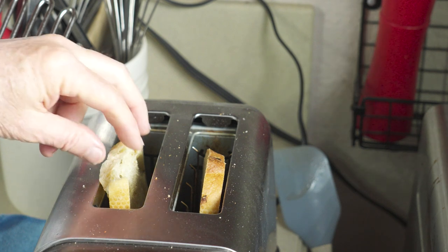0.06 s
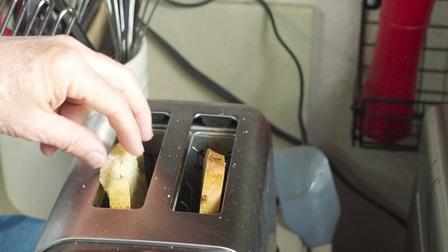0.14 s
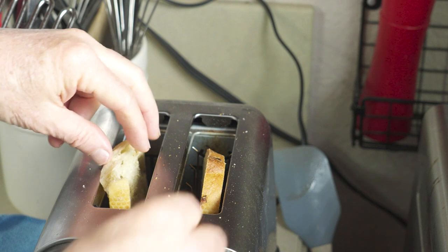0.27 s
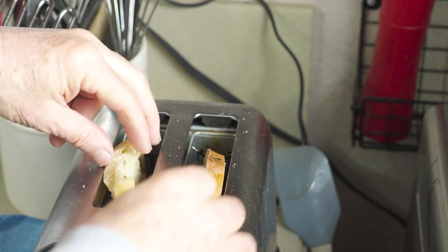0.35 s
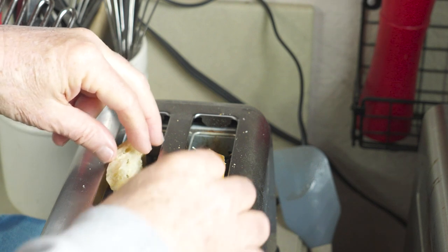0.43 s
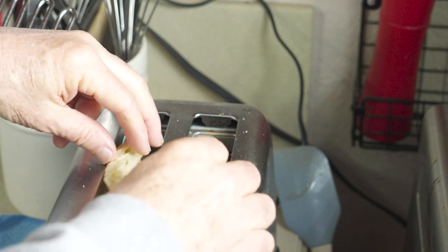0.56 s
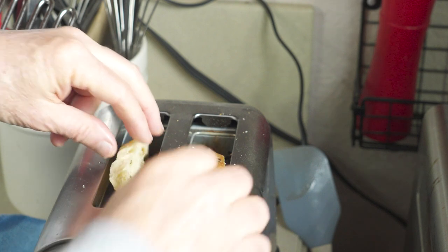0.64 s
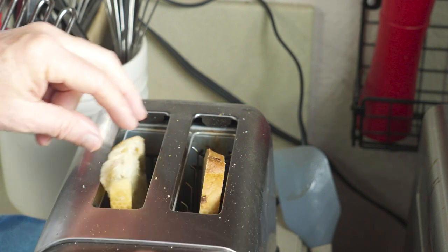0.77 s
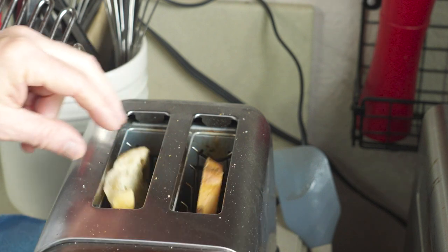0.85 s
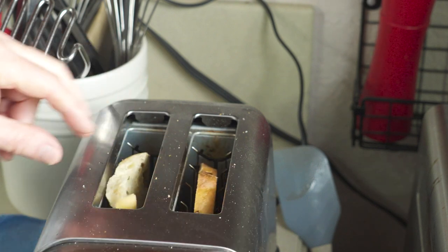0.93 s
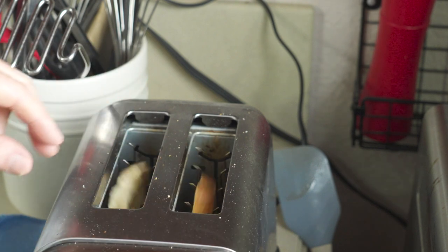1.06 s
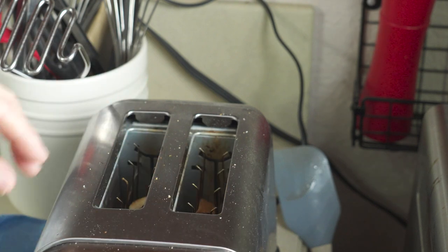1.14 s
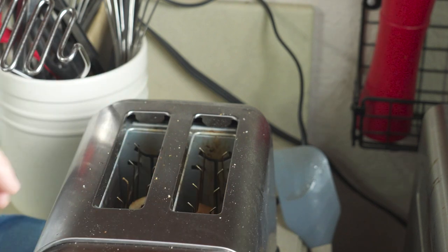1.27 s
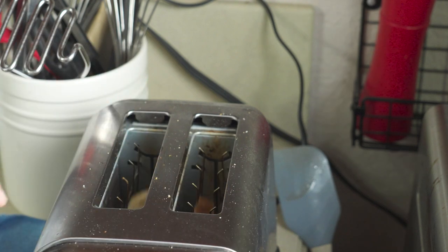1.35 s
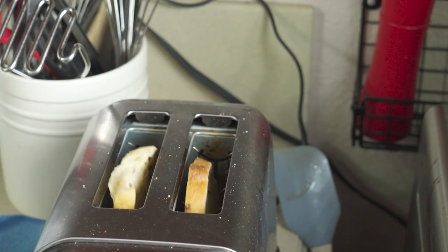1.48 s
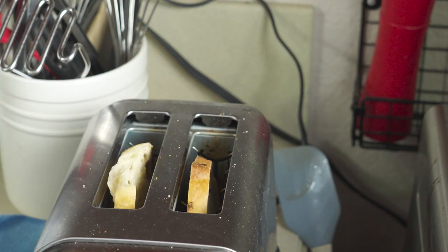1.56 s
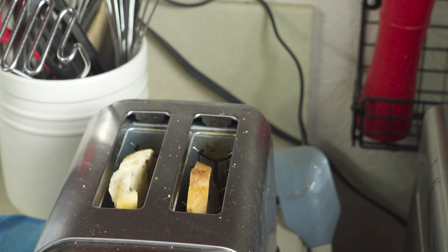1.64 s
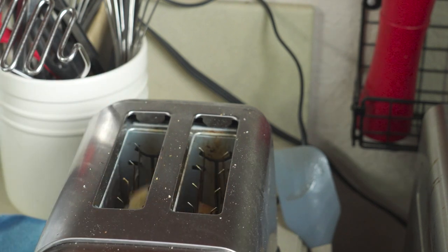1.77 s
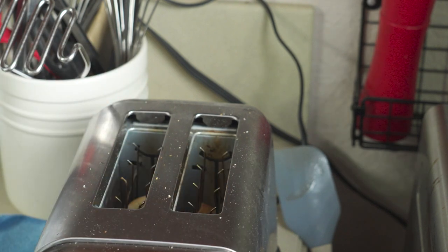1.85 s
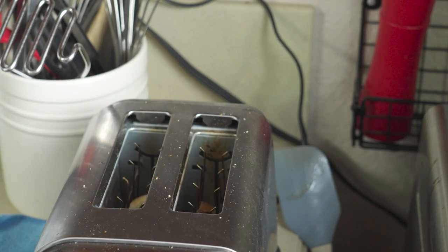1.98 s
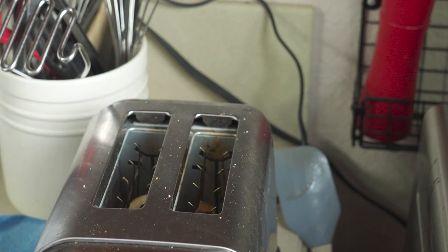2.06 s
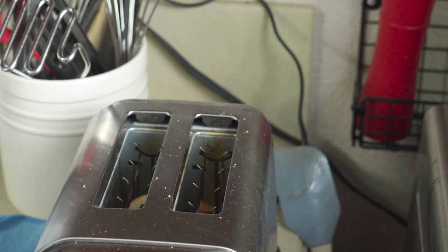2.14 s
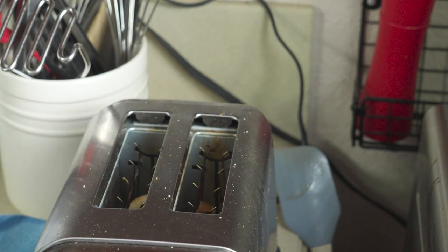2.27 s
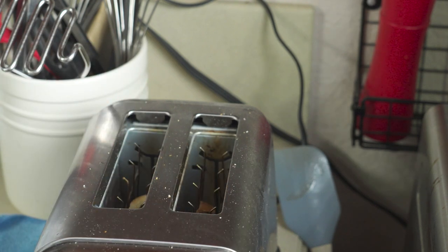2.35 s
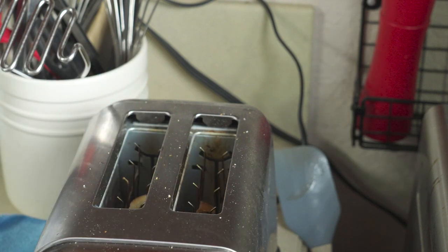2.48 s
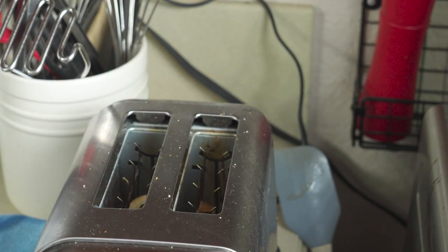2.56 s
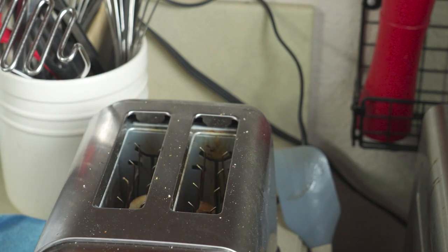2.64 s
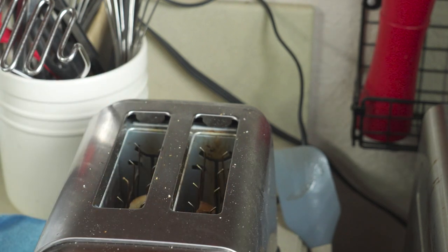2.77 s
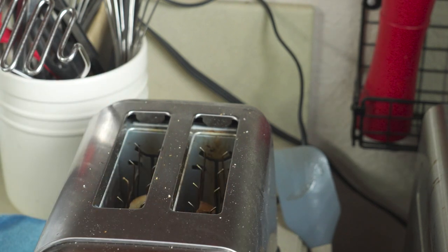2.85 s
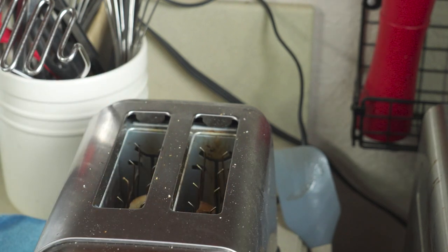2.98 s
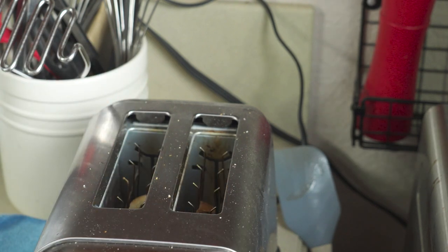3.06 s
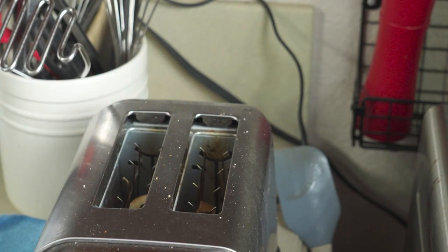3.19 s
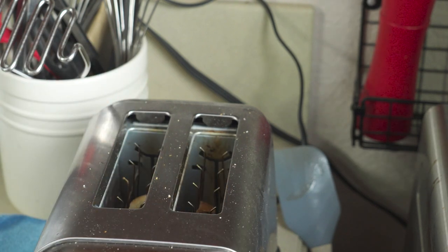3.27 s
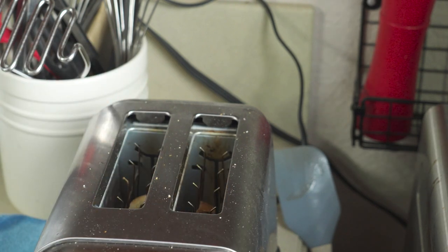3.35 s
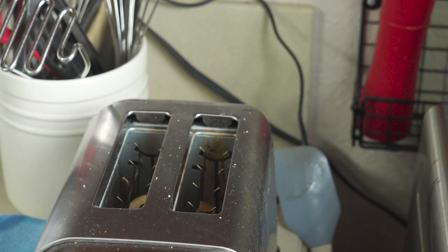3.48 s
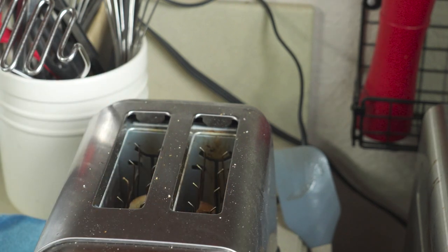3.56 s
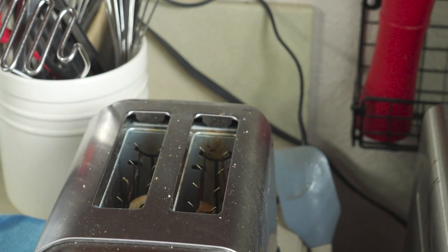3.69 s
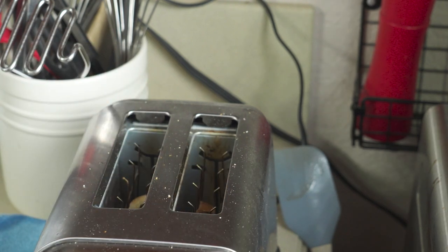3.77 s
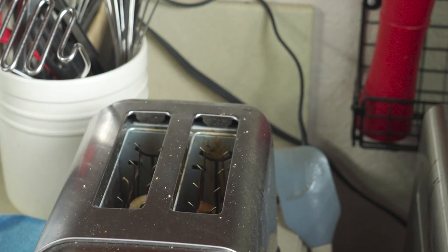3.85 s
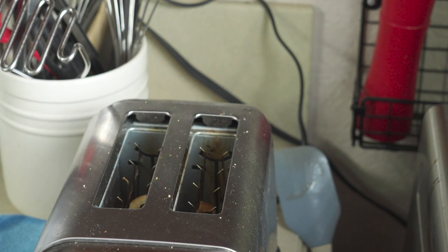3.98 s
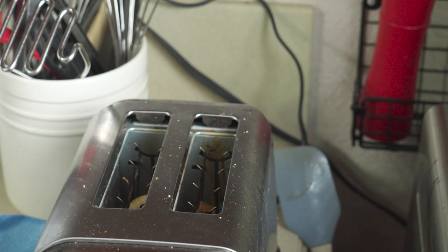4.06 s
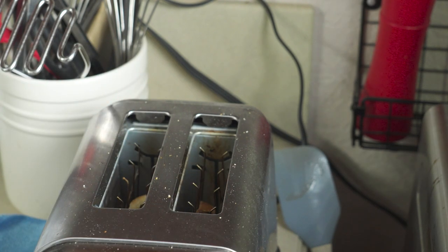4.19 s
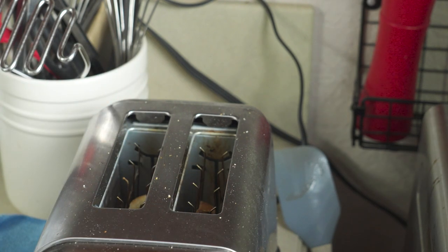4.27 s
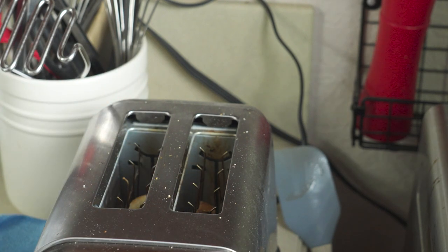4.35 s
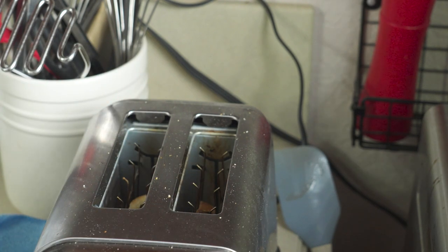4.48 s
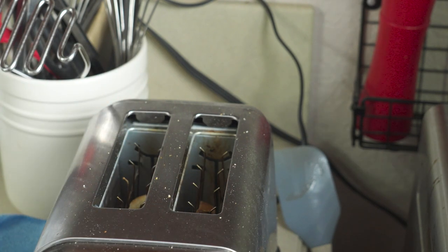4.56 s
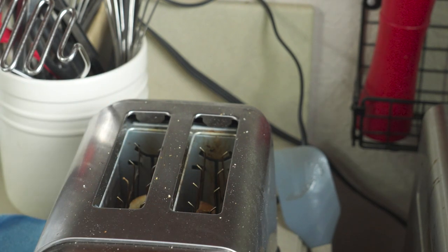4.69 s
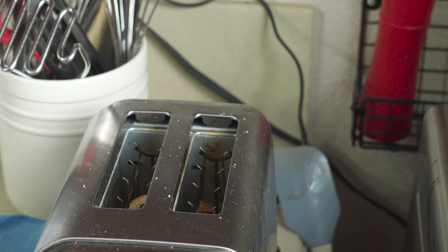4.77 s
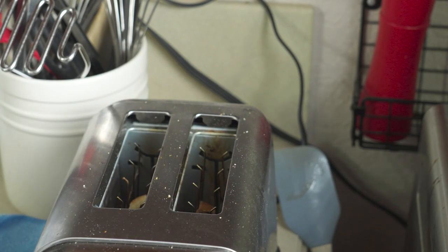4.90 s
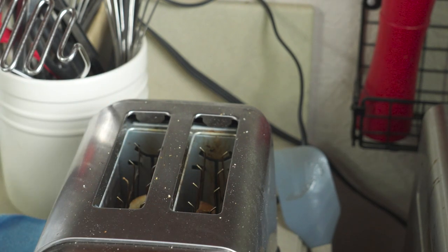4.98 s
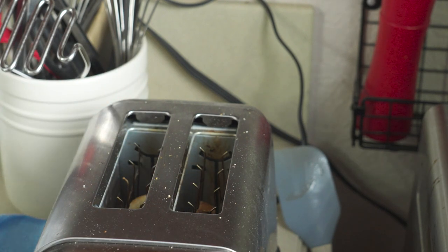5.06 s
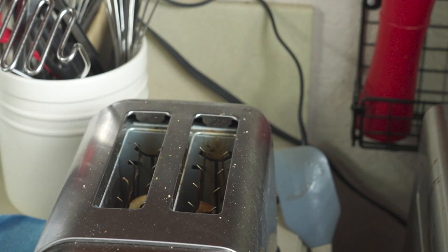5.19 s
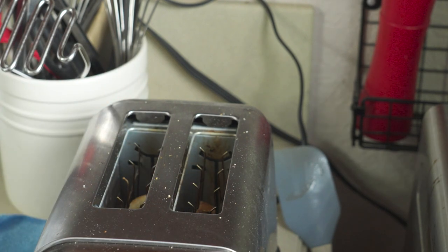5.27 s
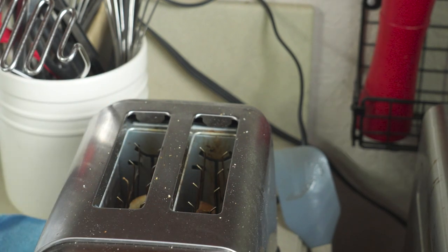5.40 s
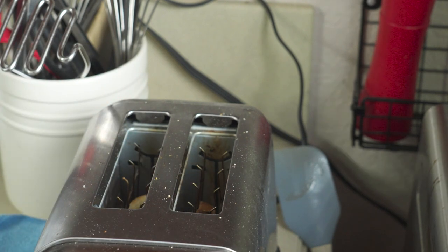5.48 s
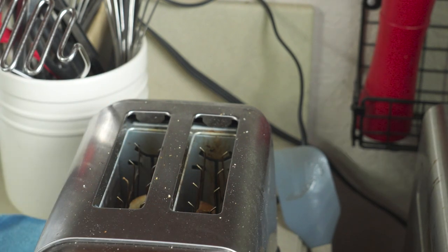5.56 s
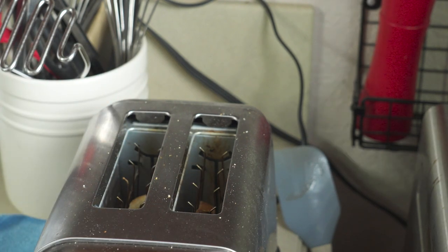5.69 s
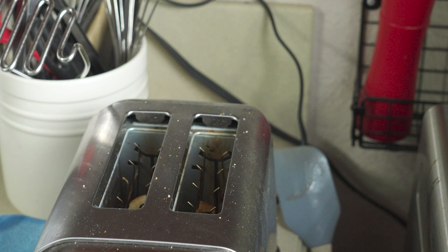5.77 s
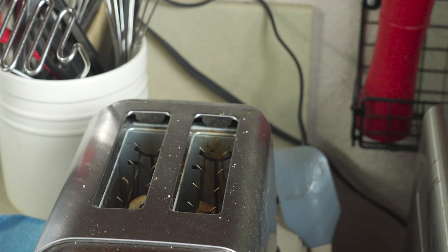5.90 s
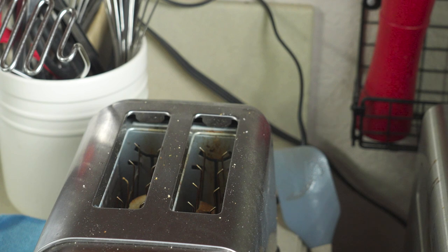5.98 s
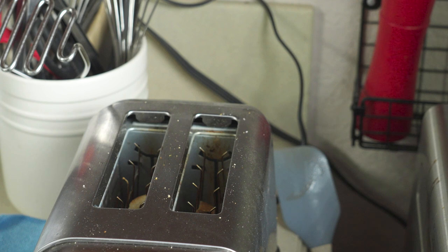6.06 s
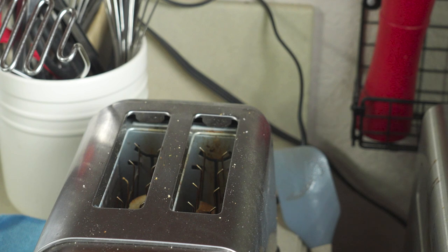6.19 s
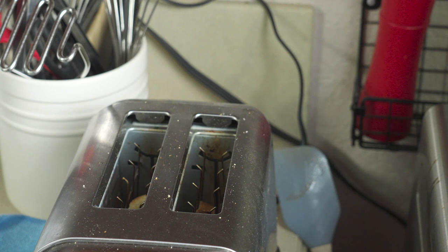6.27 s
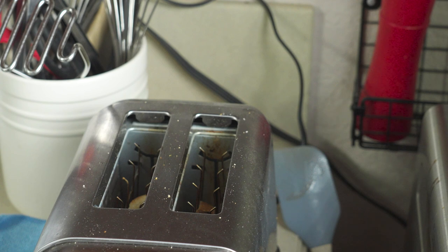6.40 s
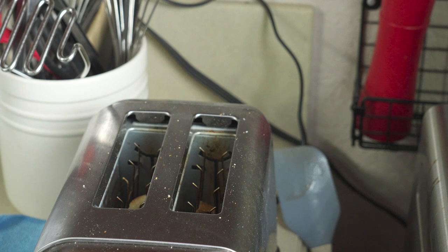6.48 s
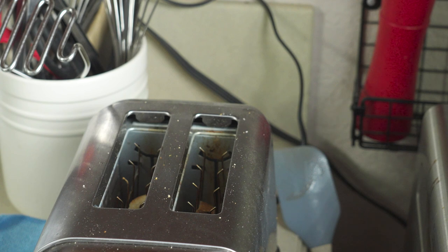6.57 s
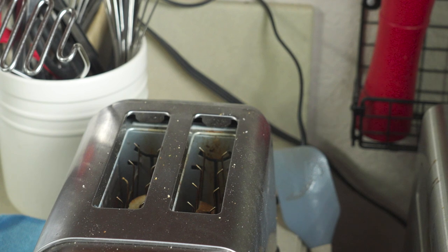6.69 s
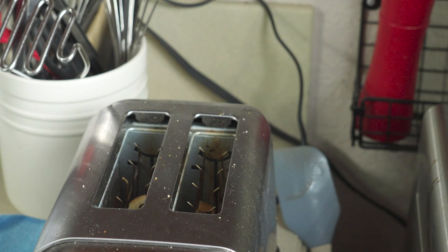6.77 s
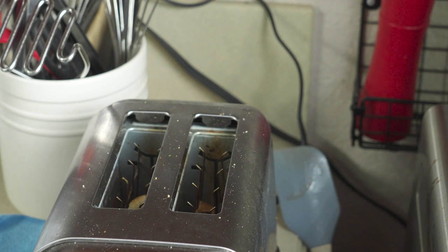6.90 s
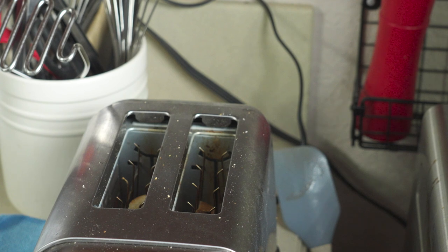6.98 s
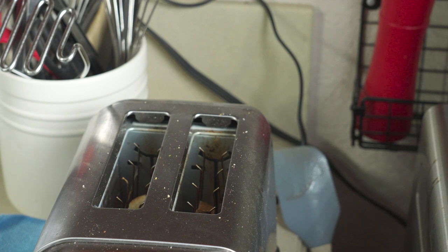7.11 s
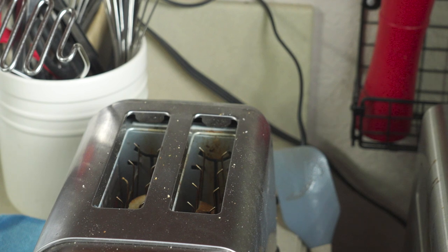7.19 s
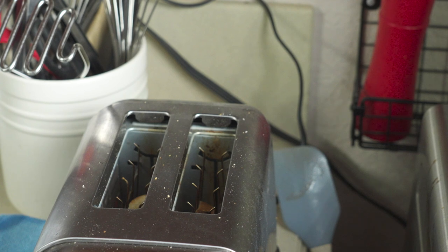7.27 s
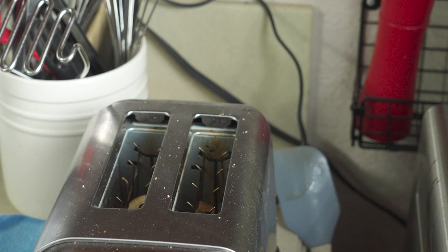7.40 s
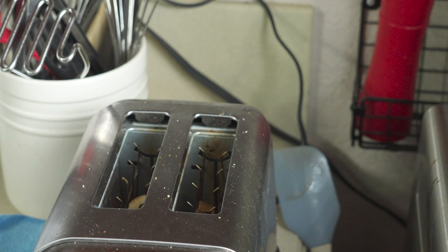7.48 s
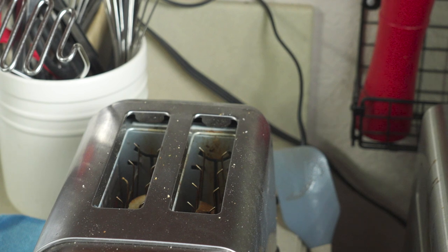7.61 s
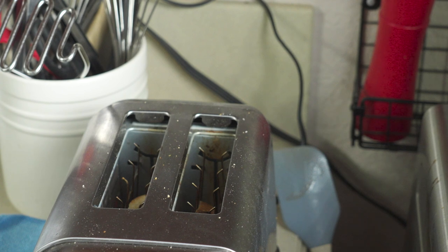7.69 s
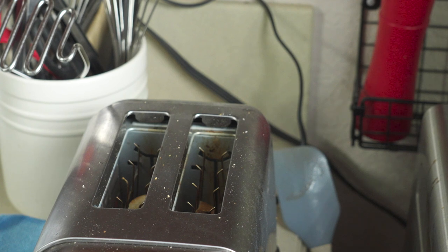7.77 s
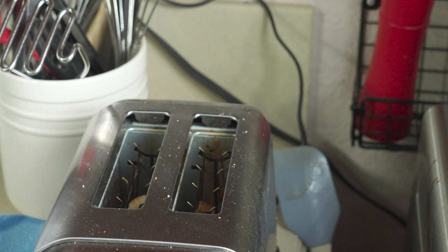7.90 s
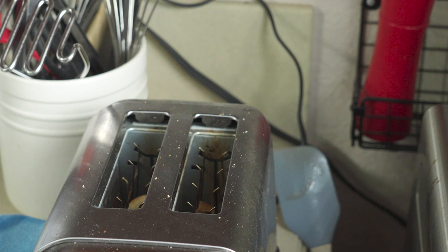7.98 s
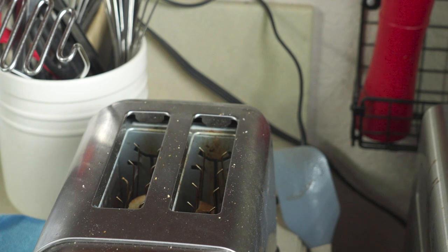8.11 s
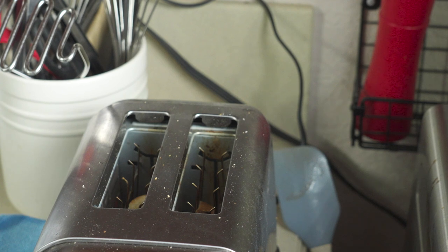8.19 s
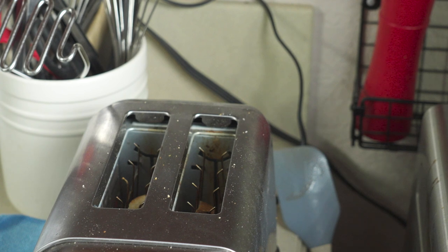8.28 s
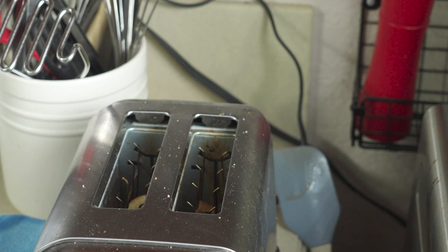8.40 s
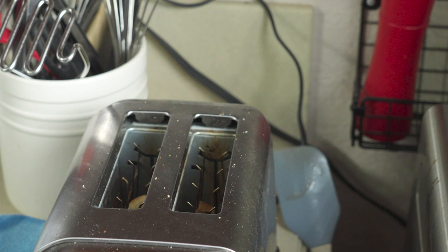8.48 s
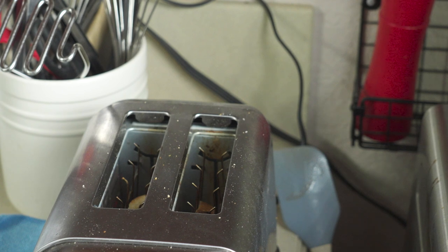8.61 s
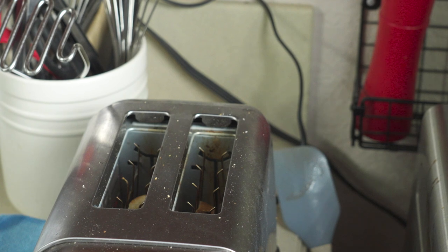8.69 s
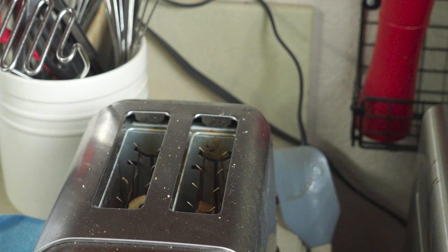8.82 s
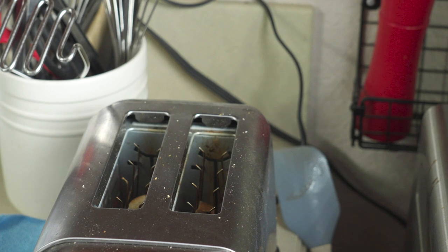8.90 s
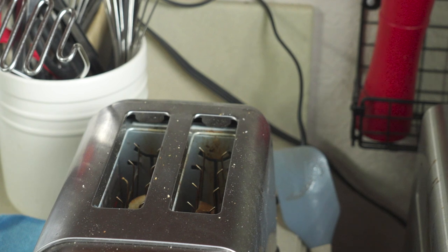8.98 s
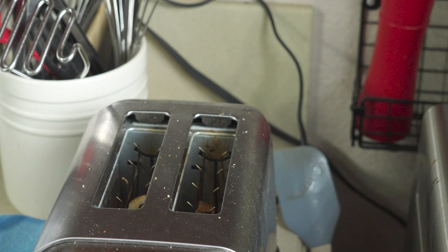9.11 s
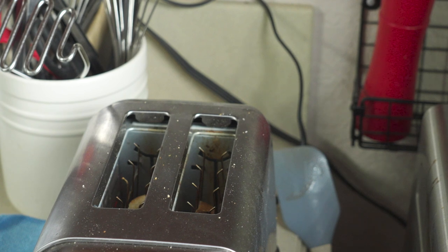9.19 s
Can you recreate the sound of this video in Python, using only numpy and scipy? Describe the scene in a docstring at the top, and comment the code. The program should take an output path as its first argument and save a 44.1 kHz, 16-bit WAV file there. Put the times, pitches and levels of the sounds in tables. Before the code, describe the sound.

In a small, quiet kitchen, a toaster lever is pushed down with a sharp metallic clunk, jiggles back up, and is pushed again until it latches. The elements tick faintly as they warm. Someone steps softly about, handling things and putting them down with light clicks and knocks. Near the end something falls shut loudly, bounces and rings briefly. A close microphone picks up soft hiss throughout.

```python
"""A soft hiss and a faint low drone fill a small kitchen, and something is put down quietly.
A toaster's lever is pushed, springs back, and is pushed until it latches; the elements tick as they warm.
Someone steps about and handles things; at the end something drops shut, bounces and rings.
Each blow is a burst of noise plus a few clear ringing notes, and the room makes it linger."""
import sys
import numpy as np
from scipy import signal
from scipy.fft import rfft, irfft, next_fast_len
from scipy.io import wavfile

SR = 44100
rng = np.random.default_rng(int(sys.argv[2]) if len(sys.argv) > 2 else 0)


def store_pcm(level_fs):
    """Save levels as 16-bit WAV."""
    pcm = np.round(np.clip(level_fs, -1, 1) * 32767).astype(np.int16)
    wavfile.write(sys.argv[1], SR, np.atleast_2d(pcm).T)


N = 407925
TIME = np.arange(N) / SR
AGE = np.arange(int(.55 * SR)) / SR   # seconds since a blow landed
BANDS_HZ = 35 * 2 ** (np.arange(27) / 3)   # three bands to an octave

# The tone of each source's noise. Each row: frequency in Hz, relative strength in dB per Hz.
HISS_TONE = [(20, 8.5), (35, -33), (100, -13), (210, -8.5), (380, -5), (500, 0.5), (600, -5), (780, -1.5),
             (1100, -5.5), (2400, -4), (3400, 2), (5500, 1), (9000, -1), (15000, -4)]
DRONE_TONE = [(20, -26), (45, -5.5), (80, -3), (115, -9), (142, 4.5), (175, -22), (300, -7.5), (1000, -26)]
KNOCK_TONE = [(40, -29), (90, -4), (200, -5), (330, 1), (500, 1.5), (750, -2), (1500, -6.5), (2600, -10.5),
              (4000, -10), (8000, -14), (15000, -21)]
TOASTER_TONE = [(40, -13), (80, 8), (110, 1.5), (175, 2.5), (300, -5), (440, 4), (620, 2), (1000, -7),
                (1500, -2.5), (2150, -7), (2800, -1.5), (4200, -4.5), (7500, -7.5), (15000, -13)]
ELEMENT_TONE = [(300, -23), (1500, -3), (3200, 2), (6000, 5), (15000, -8)]
RUB_TONE = [(300, -17), (1200, -9), (4000, 12), (15000, 8)]
FLOOR_TONE = [(35, -33), (60, -1.5), (85, -0.5), (130, -19.5), (200, -15.5), (400, -21), (800, -36),
              (3000, -49), (15000, -64)]
CLICK_TONE = [(40, -32), (300, -16), (700, -5.5), (1250, -1.5), (2000, -1), (3300, -1.5), (5000, -6),
              (15000, -17)]
CLATTER_TONE = [(40, -31), (80, -7), (140, -9), (180, -11), (310, -2.5), (480, 1), (700, -3.5), (1300, -8),
                (1700, -9.5), (2700, -9), (5500, -8.5), (15000, -21.5)]

# The clear notes of each struck thing.
# Each row: pitch in Hz, level in dB, seconds to fade by 60 dB (called t60).
KNOCK_NOTES = [(507, -20.5, 0.52), (905, -19.5, 0.2), (1630, -20.5, 0.4)]
TOASTER_NOTES = [(78, -21, 0.21), (227, -17.5, 0.46), (400, -32, 0.24), (426, -11, 0.17), (577, -7, 0.13),
                 (649, -12, 0.19), (739, -20.5, 0.3), (866, -18.5, 0.29), (923, -17, .2), (1124, -18, 0.13),
                 (1227, -21.5, 0.16), (1313, -16, 0.17), (1455, -22, 0.17), (1550, -17, 0.13),
                 (1732, -14, 0.16), (1950, -23, 0.2), (2347, -19, 0.14), (2660, -11, 0.085),
                 (2830, -17, 0.18), (3005, -19, .2), (3147, -19, 0.16), (3305, -21, 0.13),
                 (3700, -18, 0.24), (3746, -21.5, 0.2), (4270, -17, 0.253), (5685, -31, 0.31),
                 (6800, -37, 0.27)]
ELEMENT_NOTES = [(5570, -13, .15)]
FLOOR_NOTES = [(78, -6, .3)]
CLICK_NOTES = [(1185, -17, 0.22), (1950, -20, 0.13), (2680, -12.5, 0.077)]
CLATTER_NOTES = [(133, -28, 0.67), (306.5, -5.5, 0.14), (442, -6.5, 0.1), (488, -14, 0.43),
                 (604, -32, 0.37), (777, -26, 0.45), (925, -20.5, 0.42), (1094, -17, 0.15),
                 (1270, -30, .18), (1330, -13.5, 0.11), (1350, -19.5, 0.21), (1740, -31, 0.15),
                 (2000, -35.5, 0.73), (2510, -32, 0.18), (3190, -29, 0.41), (3370, -14, 0.2)]

# Faint whines in the hiss. Each row: pitch in Hz, level against the hiss in dB.
HISS_WHINES = [(5540, -15.5), (7400, -16.5)]
# Things put down. Each row: start in seconds, level and bass in dB, ring pitch in Hz, ring level in dB.
PUT_DOWNS = [(.845, -63, 18, 400, 3), (.88, -53, 15, 483, 5), (4.16, -49, -20, 494, 2.5),
             (4.2626, -39, -16, 500, 2), (6.574, -57.5, 19, 135, 13), (7.229, -56.5, 14, 170, 3.5),
             (7.296, -53.5, 11, 394, 6), (7.502, -55.5, 16.5, 387.4, 4), (7.868, -39.5, 4, 485, -4),
             (7.9642, -30, -15.5, 618, -8), (8.362, -52, 2, 426, 4.5), (8.385, -62, 4, 338, 16.5),
             (8.408, -53.5, 12, 300, 6.5), (9.073, -55, 11.5, 374, 0), (9.197, -50, 20.5, 256, 0)]
# Lever pushes. Each row: time of the stop in seconds, its level and treble in dB,
# the scrape's head start in seconds, the scrape's level, bass and treble in dB.
LEVER_PUSHES = [(1.1736, -14, -6, .0205, -23, -20, -2.5), (1.8001, -13, -3.5, .0148, -30, -9.5, 8.5)]
# The bread carriage lets go, reaches the top, starts down again and settles on its latch. Each row:
# start in seconds, level and treble in dB, rise in seconds, ring pitch in Hz, ring level in dB.
TAPS = [(1.419, -49, 9, 0.0047, 498, -3), (1.479, -41, 8, 0.00033, 3700, 2),
        (1.683, -47.5, 7, 0.017, 448, -6), (2.007, -42, 0.5, 0.001, 496, -9)]
# The warming elements stretch. Each row: start in seconds, level in dB.
STRETCHES = [(2.205, -50.5), (2.236, -53), (2.446, -59), (2.463, -52), (3.555, -48)]
# Faint rubs. Each row: loudest moment in seconds, half length in seconds, level in dB, squeak in Hz.
RUB_STROKES = [(2.81, .045, -55, 1530), (2.998, 0.095, -54.5, 1243), (5.864, 0.044, -58.5, 1490)]
# Soft steps. Each row: start in seconds, level in dB, bass in dB.
FOOTFALLS = [(3.184, -65, 3), (3.722, -50, 2.5), (5.44, -62, 4), (5.552, -60, 10.5), (6.571, -50, -0.5),
             (6.73, -46.5, -8), (7.234, -57, 3), (8.988, -43, -10)]
# Light clicks. Each row: start in seconds, level and treble in dB, rise in seconds,
# ring pitch in Hz, ring level in dB.
LIGHT_CLICKS = [(4.149, -36, 0, 0.015, 2600, -9.5), (4.244, -47, -6, .003, 2430, -5),
                (4.2614, -38, -2.5, 0.00018, 2480, -4), (4.452, -37, -5, 0.021, 1136, -11),
                (4.488, -45, 0.5, 0.00078, 1925, -7), (4.508, -38.5, 6.5, 0.0063, 1123, -9),
                (4.607, -37, 0, 0.014, 1410, -17), (4.665, -39.5, -10, .0002, 2026, -7.5),
                (4.808, -41.5, -13, 0.0068, 1343, -14), (5.411, -51.5, -3, .0016, 1500, -16),
                (6.255, -45.5, -2, 0.0075, 1485, -13), (7.228, -49.5, -3, 0.0028, 1580, 3),
                (7.242, -45, 3.5, 0.0037, 1510, -1.5), (7.54, -42, 6, 0.022, 1877, -16),
                (9.138, -51, -6, 0.018, 1106, 4.5)]
# The falling thing lands and bounces.
# Each row: start in seconds, level and bass in dB, level of its singing note in dB.
BOUNCES = [(8.4633, -16, -4.5, -38), (8.545, -43, 9, -50), (8.600, -27.5, 5, -26), (8.681, -32.5, 0, -33),
           (8.768, -50, 8, -33.5)]
# A landing goes from edge to face to full weight.
# Each row: delay in seconds, added level, bass and treble in dB, rise in seconds.
BOUNCE_CONTACTS = [(0, -8.5, 2.5, 8.5, 0.0017), (.011, -2.5, -5.5, -0.5, 0.00095), (.026, 1, 2, -14, .0012)]
# How long the kitchen rings. Each row: frequency in Hz, t60 in seconds.
ROOM_T60 = [(60, 0.59), (200, 0.55), (500, 0.49), (1300, 0.54), (3000, 0.49), (7000, 0.4), (15000, 0.34)]
# Echoes off the counter, wall and things close by. Each row: delay in seconds, level in dB.
NEAR_ECHOES = [(.0017, -37), (.0031, -22.5), (.0053, -29.5), (.0079, -18.5), (0.0116, -19)]
# The microphone's tone. Each row: frequency in Hz, boost or cut in dB.
MIC_TONE = [(700, 1), (1500, 3.5), (3500, -0.5), (4400, -2.5), (5500, 0.76), (6500, -4.5), (7600, 0.5),
            (8700, -8), (10700, -12.5), (12000, -7), (14500, -8), (16000, -13)]


def amp(db):
    """Turn decibels into a number to multiply by."""
    return 10 ** (np.asarray(db) / 20)


def at_hz(table, hz):
    """Read between a table's rows, giving every octave equal room."""
    known_hz, values = np.transpose(table)
    return np.interp(np.log(np.maximum(hz, 1)), np.log(known_hz), values)


def colour(x, tone):
    """Make each frequency louder or softer, as a tone table says."""
    size = next_fast_len(len(x) + len(AGE))
    hz = np.arange(size // 2 + 1) * SR / size
    return irfft(rfft(x, size) * amp(at_hz(tone, hz)), size)[:len(x)]


def steady_noise(tone):
    """Even noise of strength 1 with the given tone."""
    noise = colour(rng.standard_normal(N), tone)
    return noise / noise.std()


def drift(rate_hz):
    """A random wobble of typical size 1, mostly slower than rate_hz."""
    hz = np.arange(N // 2 + 1) * SR / N
    wobble = irfft(rfft(rng.standard_normal(N)) / (1 + (hz / rate_hz) ** 2), N)
    return wobble / wobble.std()


def fade(t60):
    """Die away by 60 dB in t60 seconds."""
    return np.exp(-np.log(1000) * AGE / np.maximum(t60, 1e-3))


def band_noise():
    """One noise per band, standing for notes too crowded to tell apart."""
    edges_hz = np.outer(BANDS_HZ, 2 ** (np.array([-1, 1]) / 6))
    filters = [signal.butter(2, edges, "band", fs=SR, output="sos") for edges in edges_hz]
    white = rng.standard_normal((3, 2 * len(AGE)))   # neighbouring bands get unrelated noise
    bands = np.array([signal.sosfilt(sos, white[k % 3]) for k, sos in enumerate(filters)])
    return bands / bands.std(axis=1, keepdims=True)


def tilt(hz, bass_db, treble_db, bass_hz=380, treble_hz=2600):
    """A heavy contact brings out the bass, a hard one the treble."""
    return amp(bass_db / (1 + (hz / bass_hz) ** 2) + treble_db / (1 + (treble_hz / hz) ** 2))


def blows(hits, tone, notes, crack_t60, room_db, build_cycles, noise_db=0, snap_db=-8):
    """Each hit sets off a noisy crack, which the room carries on, and the thing's clear notes."""
    out, noise = np.zeros(N + len(AGE)), band_noise()
    band_gain = amp(at_hz(tone, BANDS_HZ)) * np.sqrt(BANDS_HZ)
    band_gain *= amp(noise_db) / np.linalg.norm(band_gain)
    direct = fade(crack_t60) + amp(snap_db) * fade(0.01)   # the contact snaps, the body fades slower
    room = amp(room_db) * fade(at_hz(ROOM_T60, BANDS_HZ)[:, None])
    build_up = np.tanh(np.outer(BANDS_HZ, AGE) / build_cycles) ** 2   # low notes take longer
    envelope = np.hypot(direct, room) * build_up
    strength = np.linalg.norm(envelope, axis=1)
    note_hz, note_db, note_t60 = np.transpose(notes)
    rings = np.sin(2 * np.pi * np.outer(note_hz, AGE)) * fade(note_t60[:, None])
    rings[::2] *= -1   # neighbouring notes swing against each other
    offsets = rng.integers(0, len(AGE), len(hits))
    for (start_s, db, bass_db, treble_db, rise_s, *own_ring), offset in zip(hits, offsets):
        crack = noise[:, offset:offset + len(AGE)] * envelope
        even_out = strength / np.linalg.norm(crack, axis=1)   # chance sets the grain, not the strength
        sound = (band_gain * even_out * tilt(BANDS_HZ, bass_db, treble_db)) @ crack
        sound += (amp(note_db) * tilt(note_hz, bass_db, treble_db)) @ rings
        if own_ring:
            ring_hz, ring_db = own_ring
            sound += amp(ring_db) * np.sin(2 * np.pi * ring_hz * AGE) * fade(t60=.15)
        start = round(start_s * SR)
        out[start:start + len(AGE)] += amp(db) * sound * (1 - np.exp(-AGE / rise_s))
    return out[:N]


def hiss(level_db=-55, sink_db_per_s=0.2559):
    """A quiet room and a sensitive microphone: slowly sinking hiss with faint whines in it."""
    whines = sum(amp(db) * drift(rate_hz=55) * np.sin(2 * np.pi * hz * TIME) for hz, db in HISS_WHINES)
    return amp(level_db - sink_db_per_s * TIME) * (steady_noise(HISS_TONE) + whines)


def drone(rest_db=-84, waver_db=4.5, stir_db=-55.5, sink_db_per_s=9.5):
    """A low drone wavers; each push or landing stirs it up, and it sinks back."""
    resting = amp(rest_db + waver_db * drift(rate_hz=0.75))
    stirred = sum((TIME > s) * amp(db + stir_db - sink_db_per_s * np.abs(TIME - s))
                  for s, db, *_ in LEVER_PUSHES + BOUNCES)
    return (resting + stirred) * steady_noise(DRONE_TONE)


def knocks(treble_db=-8.5, edge_rise_s=0.0023, settle_s=.022, settle_rise_s=0.0043):
    """Things are put down: one edge touches first, the rest follows more softly."""
    edges = [(s, db, bass, treble_db, edge_rise_s, *ring) for s, db, bass, *ring in PUT_DOWNS]
    settles = [(s + settle_s, db - 2, bass, treble_db, settle_rise_s) for s, db, bass, *_ in PUT_DOWNS]
    return blows(edges + settles, KNOCK_TONE, KNOCK_NOTES,
                 crack_t60=0.087, room_db=-8.5, build_cycles=0.17, noise_db=0.5, snap_db=-17)


def toaster_lever():
    """The lever drives a sprung carriage, which scrapes and strikes inside the steel shell."""
    hits = []   # each row: start in seconds, level, bass and treble in dB, rise in seconds
    for s, db, treble, scrape_s, scrape_db, *scrape_tilt in LEVER_PUSHES:
        grip = (s - scrape_s - 0.0052, scrape_db - 16, *scrape_tilt, 0.0032)   # the spring is taken up
        scrape = (s - scrape_s, scrape_db, *scrape_tilt, 0.0027)
        stop = (s, db, -7, treble, 0.00024)
        rebound = (s + .016, db - 21, 8, treble, .0008)   # the shell rocks back onto its feet
        hits += [grip, scrape, stop, rebound]
    taps = [(s, db, -3, treble, rise, *ring) for s, db, treble, rise, *ring in TAPS]
    # between the pushes the carriage jiggles three times, ever softer
    jiggles = [(1.436 + k * .062, -40 - k, -2, -6, 0.0095) for k in range(3)]
    return blows(hits + taps + jiggles, TOASTER_TONE, TOASTER_NOTES,
                 crack_t60=0.18, room_db=-10.5, build_cycles=1.0, noise_db=-2.2, snap_db=4.5)


def heating_elements(rise_s=.00025):
    """The elements tick brightly as they warm up and stretch."""
    ticks = [(s, db, 0, 0, rise_s) for s, db in STRETCHES]
    return blows(ticks, ELEMENT_TONE, ELEMENT_NOTES,
                 crack_t60=0.034, room_db=-27, build_cycles=0.61, snap_db=-0.5)


def rubbing(squeak_db=-12.5, fall_hz_per_s=1240):
    """One surface brushes another: a bright swish swells and fades around a shaky, falling squeak."""
    out, swish = np.zeros(N), steady_noise(RUB_TONE)
    shake = amp(squeak_db) * drift(rate_hz=120)
    for s, half_length, db, hz in RUB_STROKES:
        t = TIME - s
        squeak = shake * np.sin(2 * np.pi * (hz - fall_hz_per_s * t / 2) * t)
        swell = np.exp(-np.minimum((t / half_length) ** 2, 20))
        out += amp(db) * swell * (swish + squeak)
    return out


def footsteps(sole_s=0.029, sole_db=-1.5, rise_s=0.0043):
    """Feet thud softly on the floorboards, heel first and then sole."""
    heels = [(s, db, bass, 0, rise_s) for s, db, bass in FOOTFALLS]
    soles = [(s + sole_s, db + sole_db, bass, 0, rise_s) for s, db, bass in FOOTFALLS]
    return blows(heels + soles, FLOOR_TONE, FLOOR_NOTES,
                 crack_t60=0.14, room_db=-12, build_cycles=.7, noise_db=1.5)


def handling_clicks():
    """Handled things give thin clicks; a slow rise turns a click into a scrape."""
    clicks = [(s, db, 0, treble, rise, *ring) for s, db, treble, rise, *ring in LIGHT_CLICKS]
    return blows(clicks, CLICK_TONE, CLICK_NOTES,
                 crack_t60=0.062, room_db=-15, build_cycles=0.72, noise_db=-0.5, snap_db=0)


def clatter(note_hz=502, note_rise_s=0.01, note_t60=0.26):
    """Something falls shut and bounces; every landing renews one singing note."""
    hits, swell = [], np.zeros(N)
    for s, db, bass, note_db in BOUNCES:
        for delay, added_db, added_bass, treble, rise in BOUNCE_CONTACTS:
            hits.append((s + delay, db + added_db, bass + added_bass, treble, rise))
        age = np.maximum(TIME - s, 0)
        swell += amp(note_db) * np.tanh(age / note_rise_s) ** 2 * amp(-60 * age / note_t60)
    note = swell * np.sin(2 * np.pi * note_hz * TIME)
    return note + blows(hits, CLATTER_TONE, CLATTER_NOTES,
                        crack_t60=0.098, room_db=-7.5, build_cycles=0.76, noise_db=-1.1)


def early_echoes(x, lowest_hz=1100):
    """Small surfaces throw back only the short waves, which puts a ripple on the treble."""
    bright = signal.sosfilt(signal.butter(2, lowest_hz, "high", fs=SR, output="sos"), x)
    return x + sum(amp(db) * np.interp(TIME - delay, TIME, bright, left=0) for delay, db in NEAR_ECHOES)


def scene():
    """Everything reaches one microphone, straight and by way of the surfaces around it."""
    close = toaster_lever() + heating_elements() + clatter()
    moving_about = knocks() + handling_clicks() + footsteps() + rubbing()
    return early_echoes(close + moving_about + hiss() + drone())[None]


def record(dry, cutoff_hz=15900):
    """The microphone colours the sound, and the highest treble is cut off."""
    top_cut = signal.ellip(10, .1, 80, cutoff_hz, fs=SR, output="sos")
    return signal.sosfilt(top_cut, colour(dry[0], MIC_TONE))[None]


dry = scene()
out = record(dry)
store_pcm(out)
```